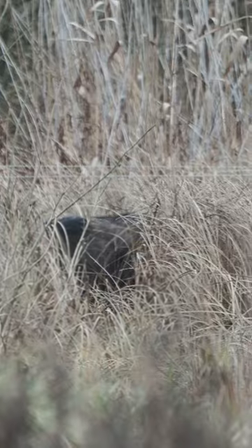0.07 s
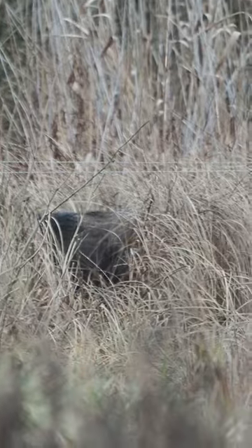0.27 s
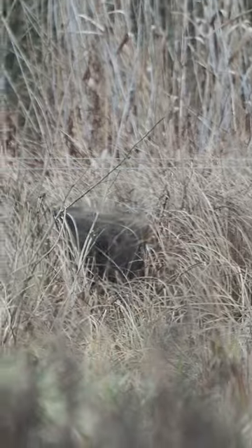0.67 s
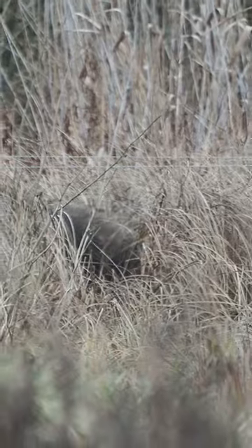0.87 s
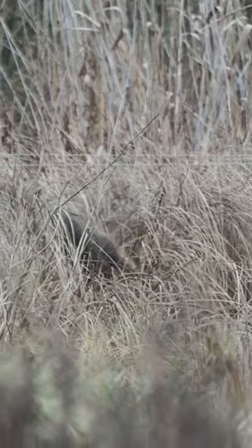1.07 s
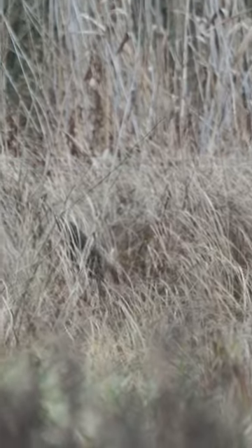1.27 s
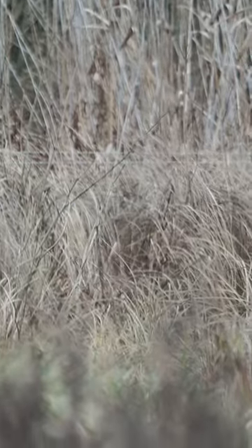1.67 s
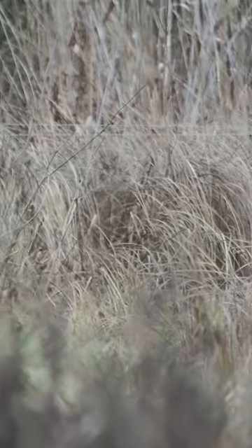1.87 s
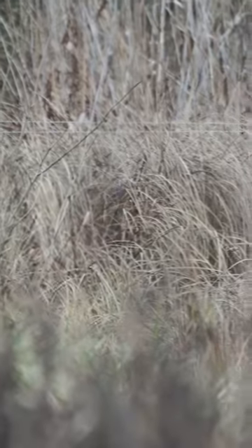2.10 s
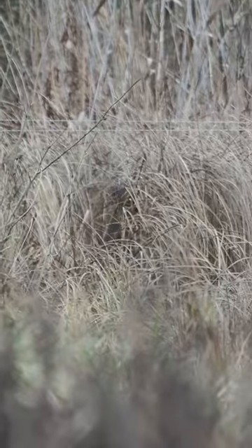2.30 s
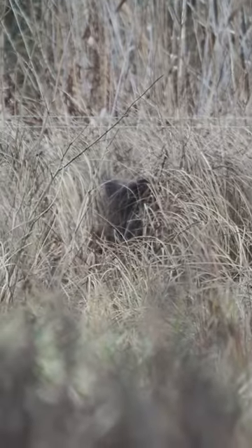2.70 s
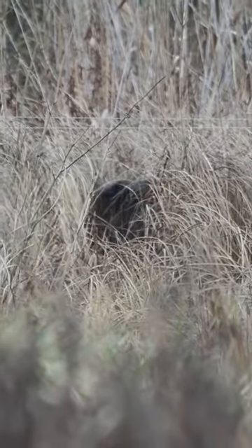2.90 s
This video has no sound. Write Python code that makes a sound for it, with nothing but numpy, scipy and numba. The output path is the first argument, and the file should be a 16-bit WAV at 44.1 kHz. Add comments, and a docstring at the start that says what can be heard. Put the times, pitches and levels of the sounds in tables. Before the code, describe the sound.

Light wind buffets the microphone in low, uneven gusts, mostly on the right, easing toward the end. Behind it lie a faint hiss of dry grass and barely audible distant animal calls, with one small click and a soft bump midway.

```python
"""A field of dry grass and reeds, in light wind. Gusts swirl against the two microphone ports,
mostly the right one; the stronger the gust, the louder and brighter the buffeting.
Behind them lie a distant rumble and rush, a few faint animal calls, one bird chirp, a thin even hiss
and a faint camera whine. Quick taps on a small woody body make one click; one soft low bump follows."""
import sys
import numpy as np
from scipy import signal
from scipy.fft import rfft, irfft
from scipy.io import wavfile
from scipy.ndimage import uniform_filter1d
from numba import njit

SR = 44100
rng = np.random.default_rng(int(sys.argv[2]) if len(sys.argv) > 2 else 0)


def store_wav(level_fs):
    """Save 16-bit WAV to argv[1]."""
    pcm = np.round(np.clip(np.atleast_2d(level_fs), -1, 1) * 32767)
    wavfile.write(sys.argv[1], SR, pcm.T.astype(np.int16))


N = 134505
TIME, FREQS = np.arange(N) / SR, np.fft.rfftfreq(N, 1 / SR)


def undb(db):
    """Turn decibels into a gain."""
    return 10 ** (np.asarray(db) / 20)


def unit(x):
    """Scale a signal to an average (rms) level of 1."""
    return x / np.sqrt(np.mean(x ** 2))


def pan(db):
    """Left and right gains that put the left side db above the right."""
    return undb(np.array([[db], [-db]]) / 2)


def over_time(points):
    """Join (time, value) points with straight lines."""
    times, values = np.array(points).T
    return np.interp(TIME, times, values)


def over_frequency(points):
    """Join (frequency, value) points with straight lines on an octave scale."""
    hz, values = np.array(points).T
    return np.interp(np.log(FREQS + 1), np.log(hz), values)


def noise(spectrum):
    """Noise with the given tone colour, at level 1."""
    white = rfft(rng.standard_normal(N))
    return unit(irfft(white * undb(over_frequency(spectrum)), N))


def wander(rate_hz):
    """A smooth random wobble: random steps with their edges rounded twice."""
    hold = int(SR / rate_hz)
    steps = np.repeat(rng.standard_normal(N // hold + 1), hold)
    return unit(uniform_filter1d(uniform_filter1d(steps, hold), hold)[:N])


def flicker(x, depth_db, rate_hz):
    """Let each of nine octaves, from 64 Hz up, waver in level on its own."""
    octave = np.clip(np.log2(FREQS / 64 + 1e-9), 0, 8)
    spectrum = rfft(x)
    bands = (irfft(spectrum * np.maximum(1 - abs(octave - k), 0), N) for k in range(9))
    return sum(band * undb(depth_db * wander(rate_hz)) for band in bands)


@njit
def moving_lowpass(x, cutoff_hz, damping):
    """Soften everything above a moving cutoff (a state-variable filter)."""
    low, band_state, low_state = np.empty(len(x)), 0., 0.
    for i in range(len(x)):
        step = np.tan(np.pi * cutoff_hz[i] / SR)
        band = (band_state + step * (x[i] - low_state)) / (1 + step * (step + damping))
        low[i] = low_state + step * band
        band_state = 2 * band - band_state
        low_state += 2 * step * band
    return low


# How much of a far sound the two ports share: f/Hz, share/0-1
SHARED_SOUND = [(100, 1), (400, 0.71), (1100, 0.63), (1600, 0.9), (2400, 0.42), (3200, 0.08), (8000, 0.03)]

def far_noise(spectrum, left_lag_s=0.00014):
    """Noise from afar: partly alike at the two ports, and a little later on the left."""
    shared, left, right = rfft(rng.standard_normal((3, N)))
    share = over_frequency(SHARED_SOUND)
    delay = np.exp(-2j * np.pi * FREQS * left_lag_s)
    alike = np.sqrt(share) * np.array([shared * delay, shared])
    apart = np.sqrt(1 - share) * np.array([left, right])
    return unit(irfft((alike + apart) * undb(over_frequency(spectrum)), N))


def camera_whine(hz=3456, rms_db=-86):
    """The camera gives off a thin, steady tone."""
    start_cycles = rng.random((2, 1)) / 2
    return np.sqrt(2) * undb(rms_db) * np.sin(2 * np.pi * (hz * TIME + start_cycles))


# Tone colour of the hiss: f/Hz, relative level/dB
HISS_COLOUR = [(1000, 1), (1900, 0.5), (2600, 8.5), (3500, 5), (4200, 0), (6000, -2), (6900, 1),
               (8000, -5.5), (10300, -3), (11200, -18.5), (13200, -5), (14300, -21.5), (16000, -4)]
# Loudness of the hiss: t/s, level/dB
HISS_LOUDNESS = [(.17, -64.5), (.38, -65), (.8, -66), (1.5, -66.5), (3.03, -66.5)]

def hiss():
    """Grass and microphone make a smooth high hiss, a little stronger at the start."""
    wavering = flicker(far_noise(HISS_COLOUR), depth_db=0.86, rate_hz=16)
    return wavering * undb(over_time(HISS_LOUDNESS)) * pan(0.85)


# Tone colour of the rumble: f/Hz, relative level/dB
RUMBLE_COLOUR = [(10, -18), (25, -2.5), (45, -1), (70, -1.5), (100, -9.5), (135, -11), (190, -19.5),
                 (280, -31.5), (600, -53)]
# Tone colour of the rush: f/Hz, relative level/dB
RUSH_COLOUR = [(100, -9), (230, 2.5), (300, -0.5), (400, -0.5), (500, -5.5), (680, -1), (830, -7.5),
               (1030, -2.5), (1250, -7), (1550, -13), (1900, -21.5), (4000, -34)]

def distant_air(rumble_db=-46, rush_db=-58.5, drift_db=0.1):
    """A low rumble and the wavering rush of open air come from far across the field."""
    rumble = np.array([noise(RUMBLE_COLOUR), noise(RUMBLE_COLOUR)]) * undb(rumble_db)
    rush = flicker(far_noise(RUSH_COLOUR), depth_db=0.9, rate_hz=10) * pan(-1)
    return rumble + rush * undb(rush_db + drift_db * wander(3.42))


def bird_chirp(peak_s=2.02, width_s=.02, centre_hz=2950, rise_hz_per_s=9000, db=-69):
    """A far bird gives one faint, rising chirp with an unsteady pitch."""
    age = TIME - peak_s
    hz = (centre_hz + rise_hz_per_s * age) * (1 + .04 * wander(300))
    phase = 2 * np.pi * np.cumsum(hz) / SR
    swell = np.exp(-(age / width_s) ** 2 / 2)
    return undb(db) * swell * np.sin(phase)


# The calls: start t/s, length/s, first f/Hz, last f/Hz, lift in the middle/Hz, level/dB
ANIMAL_CALLS = [(0.171, 0.32, 509.7, 472, 68, -63), (1.03, .13, 468, 519, 1.5, -65.5),
                (2.542, .22, 560.4, 500.6, 8.5, -62.5)]
# The tones in the animal's voice: multiple of the pitch, relative level/dB
VOICE_TONES = [(1, -13), (2, 2.5), (3, -10.5)]

def animal_calls(fade_s=0.021, echo_s=1.0):
    """A far animal gives faint, arching calls, smeared by echoes across the field."""
    direct = np.zeros(N)
    for start, length, first_hz, last_hz, lift_hz, db in ANIMAL_CALLS:
        progress = np.clip((TIME - start) / length, 0, 1)
        hz = first_hz + (last_hz - first_hz) * progress + lift_hz * np.sin(np.pi * progress)
        hz *= 1 + .013 * wander(70)  # a slight shake in the voice
        phase = 2 * np.pi * np.cumsum(hz) / SR
        voice = unit(sum(undb(tone_db) * np.sin(round(k) * phase) for k, tone_db in VOICE_TONES))
        fade = np.minimum(np.minimum(progress, 1 - progress) * length / fade_s, 1)
        direct += undb(db) * fade * voice
    tail = rng.standard_normal((2, N)) * undb(-60 * TIME / echo_s)
    tail /= np.sqrt(np.sum(tail[0] ** 2))
    echo = signal.fftconvolve(direct[None], tail, axes=1)[:, :N]
    return (direct + echo) / np.sqrt(2)  # equal parts of call and echo


def soft_bump(peak_s=1.968, width_s=0.012, hz=253, db=-49.5):
    """A low tone swells and dies so quickly that it sounds like a hollow bump."""
    age = TIME - peak_s
    swell = np.exp(-(age / width_s) ** 2 / 2)
    return undb(db) * swell * np.sin(2 * np.pi * hz * age)


# The taps that make up the click: t/s, level/dB
TAPS = [(1.7342, -58), (1.7362, -45), (1.7433, -56)]
# The tones the woody body rings with: f/Hz, level/dB relative to the tap, time to fade by 60 dB/s
WOOD_TONES = [(1230, -3.5, 0.029), (1330, -2.5, .03), (1820, -10, 0.024), (2310, -15, 0.017),
              (2680, -14, .015), (3650, -16, 0.01), (5600, -15, .005)]

def woody_click():
    """Three taps ring a small woody body, so close together that they sound like one click."""
    click = np.zeros(N)
    for start, tap_db in TAPS:
        age = np.maximum(TIME - start, 0)
        for hz, tone_db, ring_s in WOOD_TONES:
            click += undb(tap_db + tone_db - 60 * age / ring_s) * np.sin(2 * np.pi * hz * age)
    return click


# Wind pressure on the left and on the right port: t/s, level/dB before each port's gain
LEFT_GUSTS = [(.17, -29), (.24, -25.5), (.33, -34), (.43, -46.5), (.53, -42), (.575, -29), (.63, -59),
              (3.03, -57)]
RIGHT_GUSTS = [(.16, -24), (.19, -20.5), (.26, -29), (.32, -36), (.37, -26), (.42, -35), (.47, -22.5),
               (.52, -35.5), (.7, -40.5), (.86, -39), (.91, -28.5), (.97, -43.5), (1.02, -27.5),
               (1.11, -31), (1.2, -38), (1.235, -27), (1.265, -32.5), (1.31, -26.5), (1.35, -37),
               (1.395, -33.5), (1.415, -24), (1.5, -24), (1.55, -37.5), (1.59, -31), (1.67, -35.5),
               (1.7, -28), (1.73, -42.5), (1.78, -36.5), (1.86, -42.5), (1.91, -32), (2.0, -52),
               (2.2, -39.5), (2.28, -40), (2.38, -41.5), (2.52, -34.5), (2.57, -49), (2.67, -38.5),
               (2.79, -34), (2.85, -48.5), (3.03, -51)]
# Tone colour of the swirling air before its treble is softened: f/Hz, relative level/dB
SWIRL_COLOUR = [(8, -22.5), (18, -6), (30, 1), (50, -0.5), (70, -0.5), (100, -5), (125, 0.5), (160, -7),
                (250, -8), (600, -12)]

def wind_buffet(gusts, swirl_hz, reference_db=-26, db_per_octave=14.5, steady_s=0.031):
    """Air swirls at one port. Stronger gusts shed faster swirls, so they sound louder and brighter."""
    gust_db = over_time(gusts)
    cutoff_hz = np.clip(swirl_hz * 2 ** ((gust_db - reference_db) / db_per_octave), 20, 1000)
    swirls = moving_lowpass(noise(SWIRL_COLOUR), cutoff_hz, damping=1.46)
    swirls = moving_lowpass(swirls, cutoff_hz * 1.56, damping=1.57)
    # Even out the swirls so that the gusts set the loudness.
    span = int(steady_s * SR)
    power = uniform_filter1d(uniform_filter1d(swirls ** 2, span), span)
    return swirls / np.sqrt(power) * undb(gust_db)


def scene():
    """Wind on both ports, over the quiet sounds of the field."""
    left = wind_buffet(LEFT_GUSTS, swirl_hz=72) * undb(-2.5)  # sheltered, so its swirls are slower
    right = wind_buffet(RIGHT_GUSTS, swirl_hz=118) * undb(-0.5)
    background = distant_air() + animal_calls() + bird_chirp() + hiss() + camera_whine()
    return background + soft_bump() + woody_click() + np.array([left, right])


def record(dry, start_s=.1555, fade_s=.004, top_hz=15750):
    """The sound comes in after a short silence, with its highest treble cut off."""
    fade_in = np.sin(np.pi / 2 * np.clip((TIME - start_s) / fade_s, 0, 1))
    treble_cut = signal.ellip(12, .1, 90, top_hz, fs=SR, output="sos")
    return signal.sosfilt(treble_cut, dry * fade_in)


dry = scene()
out = record(dry)
store_wav(out)
```